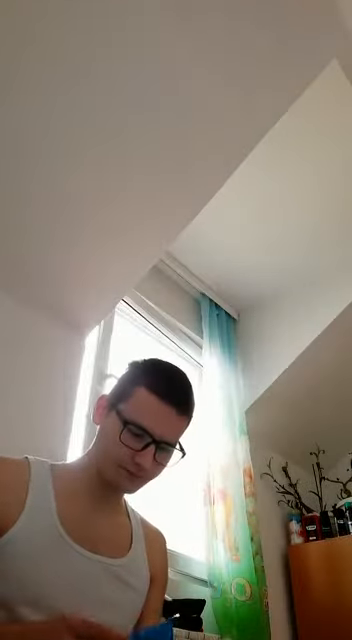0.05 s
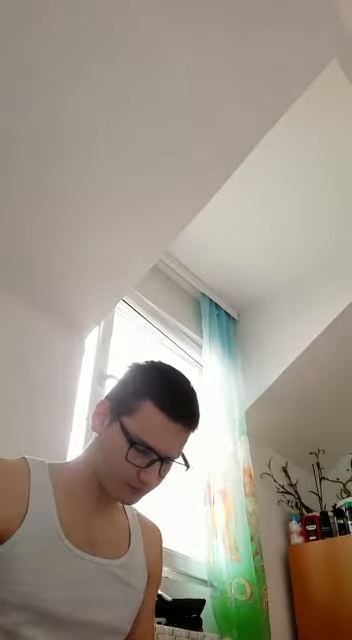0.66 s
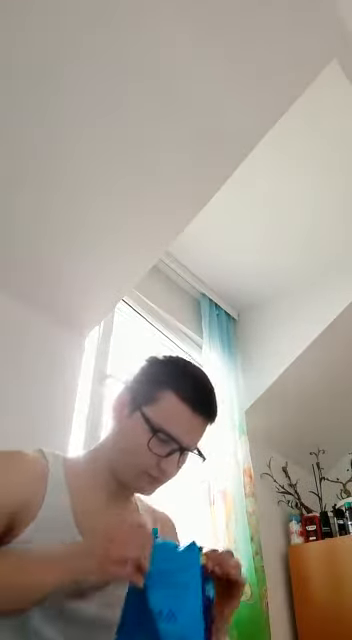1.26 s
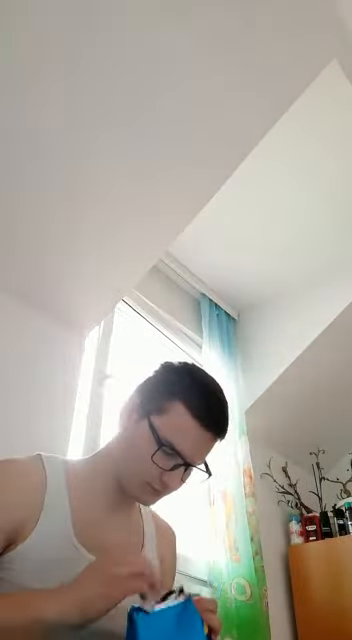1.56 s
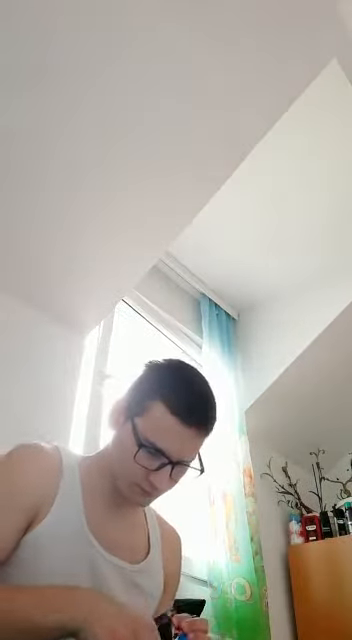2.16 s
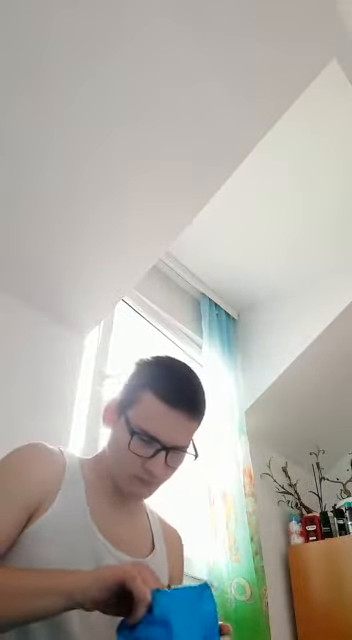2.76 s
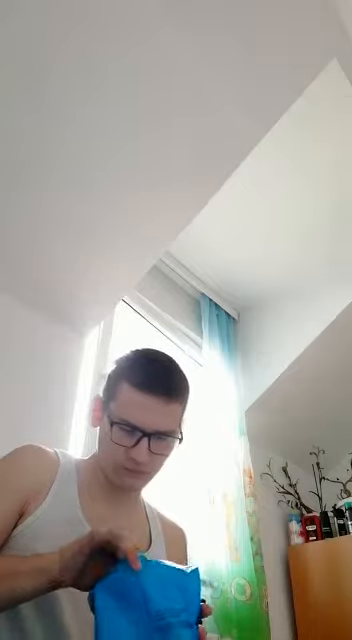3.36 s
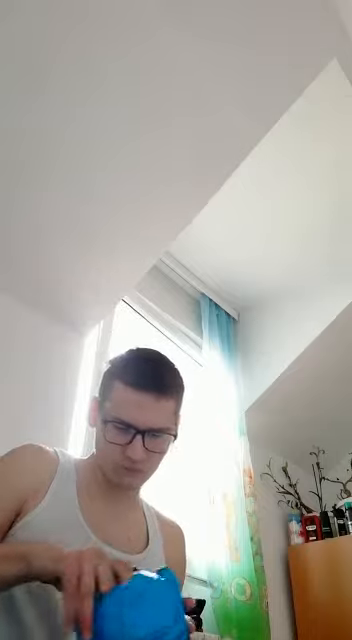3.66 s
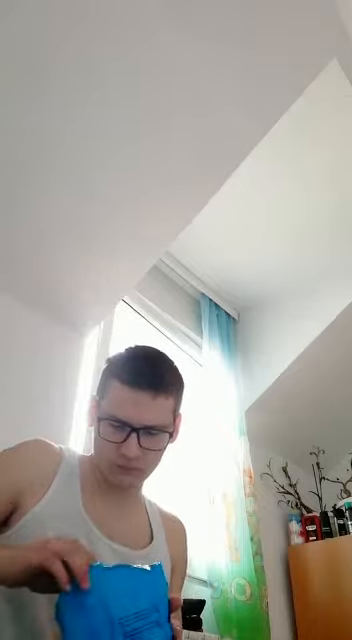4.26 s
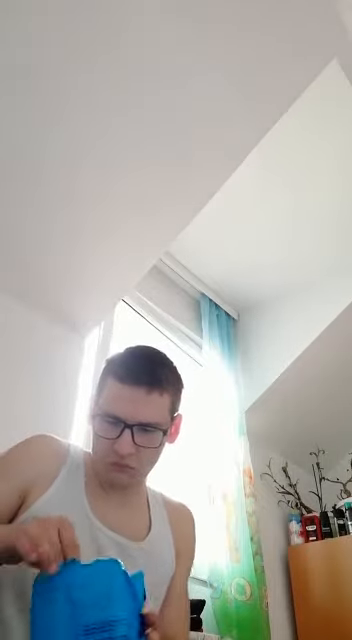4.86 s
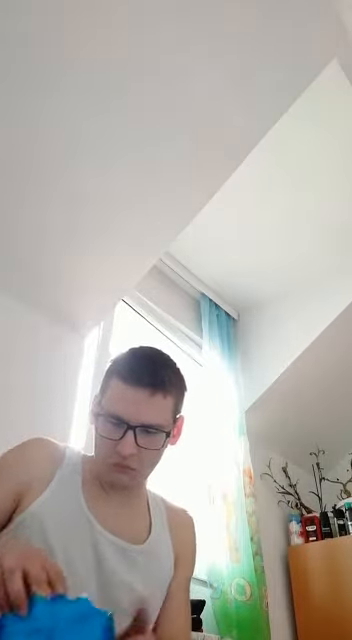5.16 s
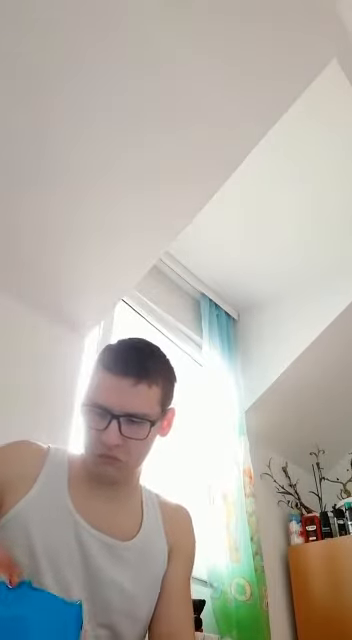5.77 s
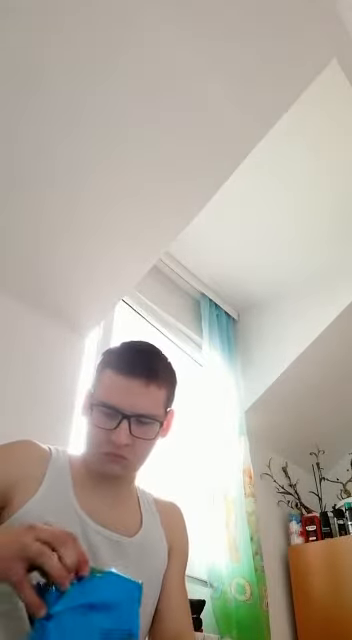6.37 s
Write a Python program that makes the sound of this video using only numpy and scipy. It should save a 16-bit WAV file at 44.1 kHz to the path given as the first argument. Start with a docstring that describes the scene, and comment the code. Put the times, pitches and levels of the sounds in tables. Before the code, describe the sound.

Close to the microphone and a little to the left, a plastic snack bag crinkles in someone's hands. The crackling is strongest about a second in, as the bag is tugged open, then eases into irregular rustling with loud snaps and a few dull pops. Fingers slip over the plastic and crinkle it again at the end. The small room adds a short bright ring over a faint rumble.

```python
"""Two hands open a plastic snack packet close to the left port of a phone, in a small, bare room.
From the first grip, fine creases buckle in swarms of tiny clicks and broad folds crackle lower. The firmest
pull comes at about one second, and a panel thumps. Softer rummaging follows, with panels flapping and single
creases snapping loudly. In the last second the film sticks and slips over skin, and the hands grip again.
Throughout, the table mirrors the packet and the walls return a short bright ring over a faint low rumble."""
import sys
import numpy as np
from scipy import signal
from scipy.fft import rfft, irfft
from scipy.io import wavfile
from scipy.ndimage import uniform_filter1d, map_coordinates

SR = 44100
rng = np.random.default_rng(int(sys.argv[2]) if len(sys.argv) > 2 else 0)


def digitize_waveform(pressure):
    """Quantize a signal to 16-bit integers and store it at the path in sys.argv[1].

    Rows of a 2-D input are taken as channels; values are limited to [-1, 1].
    """
    field = np.atleast_2d(pressure).T
    bounded = np.clip(field, -1, 1)
    quanta = np.round(bounded * 32767).astype(np.int16)
    wavfile.write(sys.argv[1], SR, quanta)


N = 282681
TIME = np.arange(N) / SR
CLICK_GAIN = np.sqrt(.002 * SR)  # turns an rms level over 2 ms into a click size

# The film as it tightens and slackens. Each row: time in seconds, ring of the fine facets in Hz,
# spread of click sizes in dB (from even hiss to separate crackles), lift of the panels from slack in dB.
FILM_STATE = [(0, 5000, -0.5, 0), (.7, 5260, 7.5, 0.5), (1.12, 5750, 4, -0.5), (1.35, 5150, 7.5, -5.5),
              (1.9, 5450, 6, 5.5), (2.6, 5650, 5.5, -7), (3.15, 5400, 7.5, -1), (3.7, 4930, 7.5, -1),
              (4.2, 7050, 8.5, 2), (4.9, 6230, 6, 0.5), (5.65, 5900, 10.5, 2.5), (5.85, 7600, -1, -6),
              (6.15, 5200, 4.5, -6), (6.3, 9350, 7.5, -6)]
# The packet as it is moved and opened. Each row: time in seconds, hollow ring in Hz,
# delay of the bounce off the table in ms.
PACKET_STATE = [(1.2, 1660, 0.4), (1.75, 1690, 0.46), (2.5, 1920, 0.46), (3.2, 2040, 0.41),
                (3.7, 2430, 0.43), (4.4, 2320, 0.45), (5, 2340, 0.352), (5.65, 2680, .34), (6.1, 2220, .39)]


def undb(db):
    """Decibels to gain."""
    return 10 ** (np.asarray(db) / 20)


def unit(x):
    """Scale to rms 1."""
    return x / np.sqrt(np.mean(x ** 2))


def curves(table):
    """Each column after the first as a curve over time."""
    times, *columns = np.transpose(table)
    return [np.interp(TIME, times, column) for column in columns]


def colour(x, eq, size=8192):
    """Minimum-phase EQ through (Hz, dB) points."""
    hz, db = np.transpose(eq)
    log_hz = np.log(np.fft.rfftfreq(size, 1 / SR) + 1)
    cepstrum = irfft(np.log(undb(np.interp(log_hz, np.log(hz), db))))
    cepstrum[1:size // 2] *= 2
    cepstrum[size // 2 + 1:] = 0
    return signal.oaconvolve(x, irfft(np.exp(rfft(cepstrum))))[:N]


def clicks(times, sizes, hz, cycles, q, front=0, samples=256):
    """Each buckle is a burst of a few cycles that rings its own facet; its energy is its size squared."""
    t = np.arange(samples) / SR
    bursts = rng.standard_normal((len(times), samples)) * np.exp(-t * hz[:, None] / cycles)
    bursts[:, 0] += front  # a clean flip starts with one hard pulse
    ratio = (np.fft.rfftfreq(2 * samples, 1 / SR) + 1) / hz[:, None]
    waves = irfft(rfft(bursts, 2 * samples) / (1 + 1j * q * (ratio - 1 / ratio)))
    waves *= (sizes / np.linalg.norm(waves, axis=1))[:, None]
    places = (times * SR).astype(int)[:, None] + np.arange(2 * samples)
    return np.bincount(np.abs(places).ravel(), waves.ravel(), N)[:N]


def room_tone(level_db=-60.5):
    """The air of the room: a faint, steady bed of rumble with a trace of hiss."""
    # Tone of the air. Each row: frequency in Hz, gain in dB.
    air_eq = [(28, -21), (42, 7.5), (70, 0), (140, -2), (700, -11.5), (8000, -19.5), (15000, -32)]
    return undb(level_db) * unit(colour(rng.standard_normal(N), air_eq))


def room(x, low_t60=0.33, high_t60=0.3, build_s=0.0046, spot_count=8):
    """Near reflections and a diffuse ring whose treble dies sooner; each spot has its own echoes."""
    # Slaps off near surfaces. Each row: mean delay in seconds, level in dB.
    reflections = [(.0017, -8), (.0067, -11), (.0087, -14.5), (0.0283, -9)]
    # Tone of the walls. Each row: frequency in Hz, gain in dB.
    wall_eq = [(100, -2.4), (1200, 0.48), (9000, 1), (16000, -1.5)]
    t = TIME[:SR // 2]
    crossover = signal.butter(2, 4000, fs=SR, output="sos")
    dwell = SR // 80  # samples between hops from spot to spot on the packet
    spots = np.repeat(rng.integers(0, spot_count, N // dwell + 1), dwell)[:N]
    out = np.zeros(N)
    for spot in range(spot_count):
        noise = rng.standard_normal(len(t))
        lows = signal.sosfiltfilt(crossover, noise)
        tail = lows * 1000 ** (-t / low_t60) + (noise - lows) * 1000 ** (-t / high_t60)
        tail *= 1 - np.exp(-t / build_s)
        response = tail / np.linalg.norm(tail)
        for delay, db in reflections:
            response[int(delay * rng.uniform(.85, 1.15) * SR)] += undb(db)
        send = np.sin(np.pi / 2 * uniform_filter1d(1. * (spots == spot), dwell))
        out += signal.fftconvolve(x * send, response)[:N]
    return colour(out, wall_eq)


def table_bounce(x, bounce=0.6):
    """The table mirrors the packet a moment later: a hollow comb colour that shifts as it moves."""
    delay_s = curves(PACKET_STATE)[1] / 1000
    mirrored = map_coordinates(x, [(TIME - delay_s) * SR], order=3)
    return (x + bounce * mirrored) / np.hypot(1, bounce)


def thumps(swell_cycles=1.25, waver=.15):
    """A panel pops through and pumps the packet's air for a few cycles, wavering as the sides give."""
    # Panel pops. Each row: start in seconds, envelope peak in dB, centre pitch in Hz.
    pops = [(0.384, -44.5, 141), (0.479, -47.5, 130), (.506, -40, 151), (1.138, -32.5, 278),
            (1.337, -45.5, 161), (2.353, -50, 146.5), (3.096, -43, 242), (4.357, -50.5, 92),
            (4.699, -41, 154), (4.728, -43.5, 174), (5.586, -48, 138), (6.375, -45, 137)]
    out = np.zeros(N)
    for start, db, hz in pops:
        give = np.interp(TIME - start, np.arange(20) / hz, rng.standard_normal(20))
        turns = np.cumsum(hz * (1 + waver * give) * (TIME > start)) / SR
        swell = turns / swell_cycles * np.exp(1 - turns / swell_cycles)
        out += undb(db) * swell * np.sin(2 * np.pi * turns)
    return out


def rubs(jitter=0.22, scatter_db=1.3, low_ring_db=1.0, low_cut_hz=1250):
    """Film sticks and slips over skin; each slip rings two resonances, with little bass radiated."""
    # Drags over skin. Each row: start in seconds, length in seconds, relative slip level in dB,
    # slips per second, low ring in Hz, high ring in Hz, sharpness as Q.
    drags = [(5.4, .031, -37.5, 525, 1380, 3080, 19), (5.823, 0.11, -34, 426, 5150, 8000, 2),
             (5.942, .16, -30.5, 84, 4050, 6640, 2.6), (6.104, .075, -32, 148, 4250, 5100, 2.9),
             (6.248, 0.105, -38.5, 110, 7200, 8660, 9.7)]
    out = np.zeros(N)
    for start, length, db, rate, low_hz, high_hz, q in drags:
        gaps, strength = rng.standard_normal((2, 64))
        age = np.cumsum(1 + jitter * gaps) / rate
        sliding = age < length
        times = start + age[sliding] - age[0]
        sizes = undb(db + scatter_db * strength[sliding]) * CLICK_GAIN
        for hz, gain in ((low_hz, undb(low_ring_db)), (high_hz, 1)):
            out += clicks(times, gain * sizes, np.full(len(sizes), hz), cycles=1.4, q=q)
    return signal.sosfilt(signal.butter(2, low_cut_hz, "high", fs=SR, output="sos"), out)


def hands(attack_s=0.013, hold_slope_db=-1.5, release_s=0.026, crease_db=-2.5, fold_db=-7):
    """Envelopes for creases and folds: a grip takes hold, fades a little, lets go; the firmest leads."""
    # The fingers close on the film. Each row: start in seconds, length in seconds, strength in dB,
    # depth in dB (how far the broad folds join the fine creases).
    grips = [(0.008, 0.085, -34.5, -3.5), (0.06, 0.057, -32, -0.5), (0.213, 0.034, -34, -4.5),
             (0.3, 0.05, -46.5, 3), (0.38, 0.069, -41.5, 0.5), (0.513, 0.31, -38.5, 2),
             (0.665, 0.12, -33.5, -0.5), (0.794, 0.11, -29.5, -6), (0.941, 0.18, -34, -12),
             (1.009, 0.053, -27.5, -7.5), (1.041, 0.093, -26, -1), (1.171, 0.086, -44.5, 6),
             (1.296, 0.055, -37.5, 4), (1.631, 0.097, -37, -1.5), (1.715, 0.075, -38.5, 3.5),
             (1.929, 0.043, -47, -6), (1.99, 0.075, -44.5, -2), (2.204, 0.19, -46.5, 0.5),
             (2.332, 0.41, -43.5, 4), (2.784, 0.093, -40, 2), (3.001, 0.0097, -40.5, 7.5),
             (3.06, 0.07, -39, 4.5), (3.112, 0.034, -35.5, -11), (3.284, 0.026, -42, -8),
             (3.501, 0.17, -41, 2), (3.69, 0.22, -46.5, 4), (3.98, .09, -56.5, 12), (4.044, 0.067, -42, -6),
             (4.252, 0.076, -50, 8.5), (4.459, 0.035, -50.5, 12.5), (4.48, 0.04, -42, -15),
             (4.633, 0.033, -51, 4.5), (4.727, 0.029, -36.5, -1.5), (4.826, 0.23, -42.5, 3),
             (5.108, 0.079, -42.5, 5), (5.236, 0.11, -34, -1), (5.382, 0.063, -38, -2),
             (5.514, 0.18, -43, 1.5), (5.731, 0.079, -43, 4), (5.815, 0.17, -36, -0.5),
             (5.99, 0.13, -38, -4), (6.126, 0.074, -33, -4), (6.247, 0.087, -34.5, -4.5)]
    creases, folds = undb(-60.5), undb(-54.5)  # the packet stirs in the hands between grips
    for start, length, db, depth_db in grips:
        age = TIME - start
        attack = np.clip(age / attack_s, 0, 1)
        hold = undb(hold_slope_db * (np.clip(age / length, 0, 1) - 0.5))
        release = np.exp(-np.maximum(age - length, 0) / release_s)
        grip = undb(db) * attack * hold * release
        creases = np.maximum(creases, grip)
        folds = np.maximum(folds, grip * undb(depth_db))
    return creases * undb(crease_db), folds * undb(fold_db)


def swarm(count, hz, spread_db, eq, scatter, cycles, q, levelling_s=0.043):
    """Creases give way at random, many small and few large, levelled to a steady mean power."""
    onsets = rng.integers(0, N, count)
    sizes = undb(spread_db[onsets] * np.minimum(rng.exponential(size=count), 4))
    facets_hz = hz[onsets] * np.exp(scatter * rng.standard_normal(count))
    crackle = unit(colour(clicks(onsets / SR, sizes, facets_hz, cycles, q, front=2.5), eq))
    span = int(levelling_s * SR)
    power = uniform_filter1d(uniform_filter1d(crackle ** 2, span), span)
    return crackle / np.sqrt(np.abs(power) + 1e-4)


def crinkle(panel_db=-4.5):
    """Fine creases, broad folds and whole panels buckle in swarms; slack panels flap with the folds."""
    # Tones of the crisp creases, mid-range folds and dull panels. Each row: frequency in Hz, gain in dB.
    crease_eq = [(300, -6), (1500, -1), (3000, -4), (6000, -5.5), (9200, -2), (11000, -9), (15000, -16)]
    fold_eq = [(200, -13), (800, -4.5), (1500, 3), (2600, -1.5), (3500, -2.5), (9000, -13)]
    panel_eq = [(30, -26.5), (100, -3.5), (230, -0.5), (430, 1), (650, -4.5), (1000, 4), (3000, -84)]
    crease_work, fold_work = hands()
    facet_hz, spread_db, slack_db = curves(FILM_STATE)
    hollow_hz = curves(PACKET_STATE)[0]
    panel_hz = 0.16 * hollow_hz  # far below the hollow, rising with it as the packet is pulled taut
    creases = swarm(1600, facet_hz, spread_db - 4.0, crease_eq, scatter=0.29, cycles=2.95, q=1.39)
    folds = swarm(750, hollow_hz, spread_db + 1.5, fold_eq, scatter=0.31, cycles=1.08, q=1.54)
    panels = swarm(1000, panel_hz, spread_db + 0.5, panel_eq, scatter=0.51, cycles=0.88, q=0.67)
    return creases * crease_work + (folds + panels * undb(panel_db + slack_db)) * fold_work


def snaps(sheet_hz=4600, ridge_ratio=1.62, hollow_db=3.5, sheet_db=2, tick_db=3.0, scatter=0.076):
    """Stiff creases flip over, ringing the hollow packet, the sheet and the sharp ridge itself."""
    # Loud single creases. Each row: start in seconds, then relative levels in dB of the hollow ring,
    # the sheet's ring and the ridge's crisp tick.
    flips = [(0.0274, -43, -34, -34), (0.228, -57, -30, -26), (0.4047, -32, -31.5, -34),
             (0.534, -48, -38, -35), (0.6907, -26, -32, -21), (0.742, -38, -28.0, -21.5),
             (0.8221, -25, -42, -18), (1.0934, -29, -34, -15), (1.2446, -44, -33, -28.5),
             (1.341, -36, -39, -44), (1.4387, -41.5, -44, -39), (1.633, -36, -31.5, -34),
             (1.7326, -26, -48, -35), (1.9273, -34.5, -32.5, -32), (1.9405, -38, -30, -50),
             (2.0203, -40, -30.5, -43), (2.228, -43, -31, -52), (2.3102, -31.5, -42, -56),
             (2.358, -39, -26.5, -44), (2.4187, -30, -50, -47.5), (2.4214, -44, -26, -29.5),
             (2.5126, -28, -42, -27.5), (2.6379, -40, -44, -28), (2.705, -32, -50, -35),
             (2.7358, -38, -35, -42), (2.758, -38, -43, -36), (2.8438, -30, -26, -38),
             (3.0187, -48, -58, -36), (3.0232, -29.5, -56, -34), (3.1053, -34, -27, -15.5),
             (3.127, -27, -25, -28), (3.2982, -35.5, -48, -22.5), (3.3032, -36, -31.5, -30),
             (3.5235, -29.5, -50, -53), (3.609, -28, -31, -30), (3.6364, -30, -46, -32),
             (3.6692, -47, -30, -35), (3.8095, -37, -20, -30), (3.9059, -33, -51, -51),
             (4.2404, -46, -26.5, -12.5), (4.3323, -37.5, -40, -44), (4.4981, -37, -38, -41),
             (4.567, -61, -51, -38), (4.6382, -51, -49, -36), (4.8097, -31, -39, -29),
             (4.829, -37, -41, -45), (4.8628, -32, -44, -44), (4.9278, -50, -29.5, -27),
             (5.022, -46, -31, -29), (5.1254, -36, -48, -26), (5.17, -39, -26, -17.5),
             (5.2056, -31, -33, -30), (5.2434, -35, -29, -29), (5.2537, -36, -27, -28),
             (5.3211, -32, -43, -25.5), (5.6152, -24.5, -51, -45), (5.73, -40, -35.5, -24),
             (6.1649, -27, -27, -36)]
    # Tone of the snaps. Each row: frequency in Hz, gain in dB.
    snap_eq = [(400, -3), (1500, -3), (9300, -4), (11000, -13), (15000, -19)]
    times, *levels = np.transpose(flips)
    hollow, sheet, tick = undb(levels) * CLICK_GAIN
    detune = np.exp(scatter * rng.standard_normal((len(times), 3))).T
    hollow_hz = np.interp(times, TIME, curves(PACKET_STATE)[0])
    ridge_hz = ridge_ratio * np.interp(times, TIME, curves(FILM_STATE)[0])  # tauter film is brighter
    out = clicks(times, hollow * undb(hollow_db), hollow_hz * detune[0], cycles=2.6, q=1.8, front=2.4)
    out += clicks(times, sheet * undb(sheet_db), sheet_hz * detune[1], cycles=3.5, q=1.8, front=2.1)
    out += clicks(times, tick * undb(tick_db), ridge_hz * detune[2], cycles=3.6, q=2.9, front=2.0)
    # a sharp flip also knocks the panel around it, softer and lower
    out += clicks(times, tick * undb(-16), 0.29 * hollow_hz, cycles=0.69, q=0.91, front=1.7)
    return colour(out, snap_eq)


def scene(port_lag_s=.00059, sway_s=.00007, shared_bass_hz=520, crack_send_db=-5.0):
    """The packet faces the left port; the phone's body shades the right one."""
    # Shading of direct sound and of room sound on the right. Each row: frequency in Hz, gain in dB.
    far_eq = [(300, 2), (1200, -1.5), (2400, -10.5), (4400, -11), (15000, -7.5)]
    far_room_eq = [(700, -2.5), (1400, -8.5), (2500, -8.5), (4400, -16), (15000, -7)]
    rustle = crinkle() + thumps()
    cracks = snaps() + rubs()
    packet = rustle + cracks
    # the lag between the ports shifts as different parts of the packet sound
    sway = np.interp(TIME, np.linspace(0, TIME[-1], 20), rng.standard_normal(20))
    lag_s = port_lag_s + sway_s * sway
    far = colour(map_coordinates(packet, [(TIME - lag_s) * SR], order=3), far_eq)
    # the loudest creases and the slips face the phone, so the walls get less of them
    to_walls = rustle + undb(crack_send_db) * cracks
    left_room, right_room = room(to_walls), room(to_walls)
    # long waves reach both ports alike
    bass = signal.butter(2, shared_bass_hz, fs=SR, output="sos")
    right_room += signal.sosfiltfilt(bass, left_room - right_room)
    left = table_bounce(packet) + left_room
    right = far + colour(right_room, far_room_eq)
    return np.array([left, right]) + room_tone()


def record(dry):
    """The phone cuts the top above 16 kHz."""
    return signal.sosfilt(signal.ellip(8, .2, 70, 16000, fs=SR, output="sos"), dry)


dry = scene()
out = record(dry)
digitize_waveform(out)
```